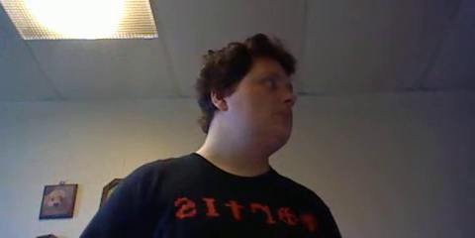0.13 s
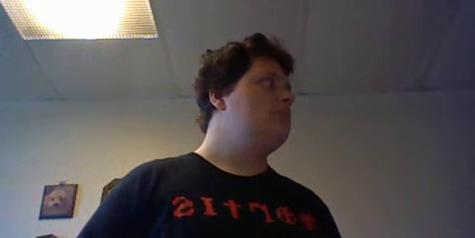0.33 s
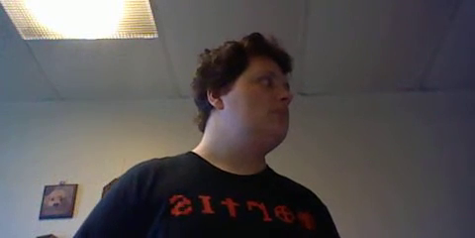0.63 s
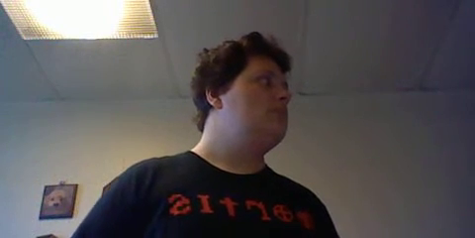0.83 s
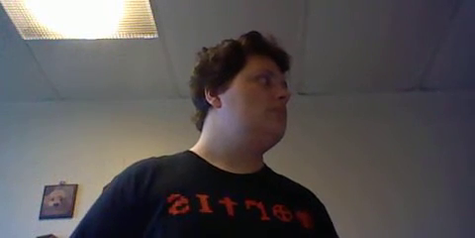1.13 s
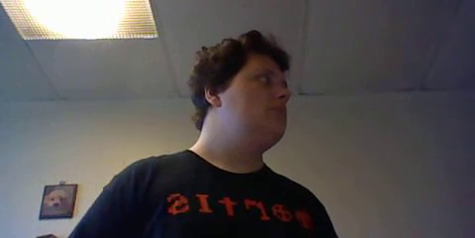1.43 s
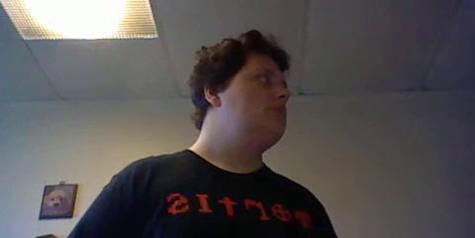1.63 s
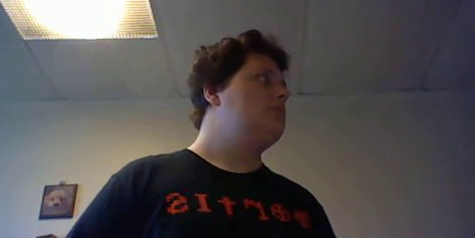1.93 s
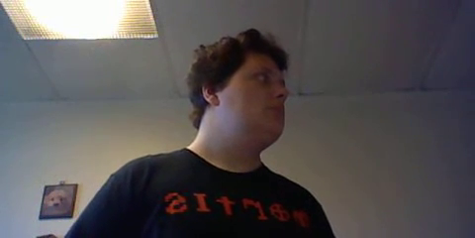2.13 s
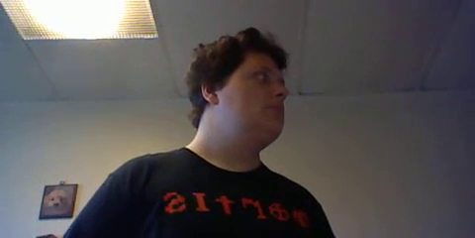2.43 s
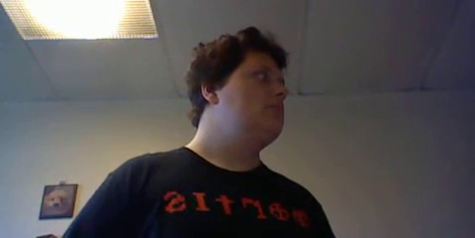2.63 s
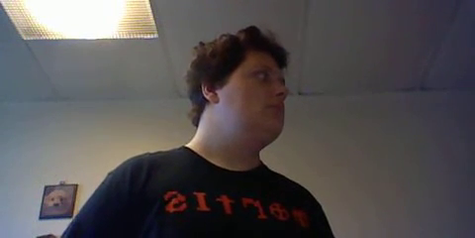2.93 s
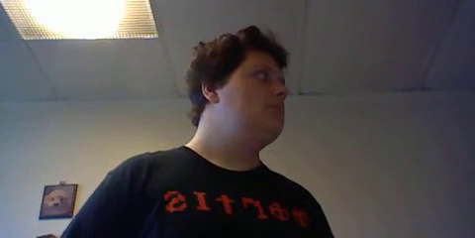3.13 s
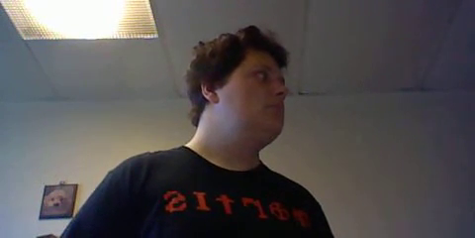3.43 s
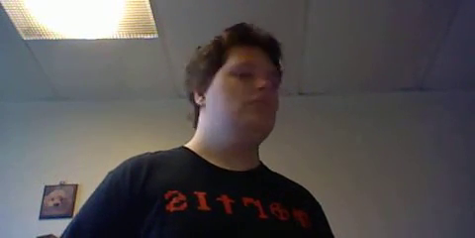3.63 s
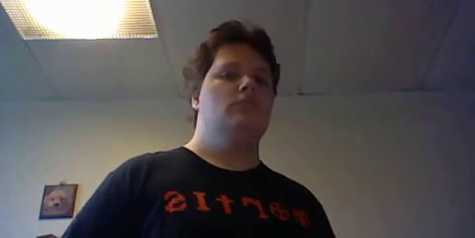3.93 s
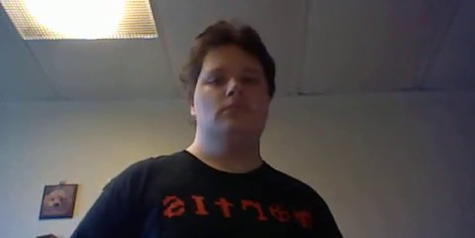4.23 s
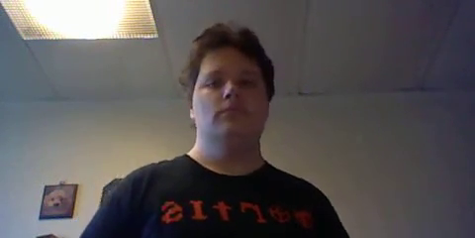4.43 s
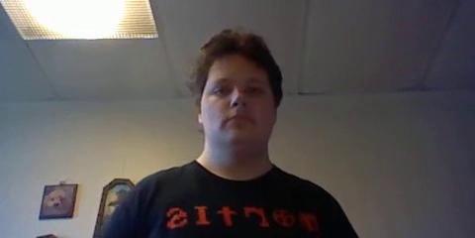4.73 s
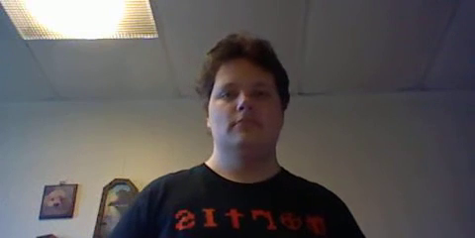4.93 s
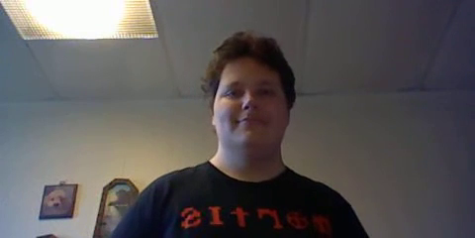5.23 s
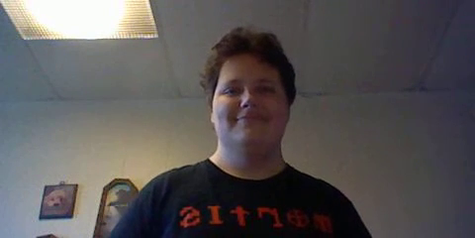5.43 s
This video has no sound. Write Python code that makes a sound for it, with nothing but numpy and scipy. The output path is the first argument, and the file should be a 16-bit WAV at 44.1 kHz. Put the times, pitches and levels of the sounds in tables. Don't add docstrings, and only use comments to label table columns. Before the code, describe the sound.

A microwave oven hums and buzzes steadily with a whirring fan while a vehicle outside idles low and then pulls away, under faint hiss.

```python
import sys
import numpy as np
from scipy import signal
from scipy.fft import rfft, irfft, next_fast_len
from scipy.io import wavfile
from scipy.ndimage import map_coordinates

SR = 44100
rng = np.random.default_rng(int(sys.argv[2]) if len(sys.argv) > 2 else 0)


def to_wav(sig):
    pcm = np.clip(np.atleast_2d(sig), -1, 1) * 32767
    pcm = np.round(pcm).astype(np.int16)
    wavfile.write(sys.argv[1], SR, pcm.T)


def decibels_to_gain(level_db):
    exponent = np.asarray(level_db, float) / 20
    return 10 ** exponent


N = 245195
TIME_S = np.arange(N) / SR
SINCE_BEAT_S = TIME_S - .697


def unit(x):
    return x / np.sqrt(np.mean(x ** 2) + 1e-20)


def along(points, hz):
    f, v = np.transpose(points)
    return np.interp(np.log(hz + 1), np.log(f + 1), v)


def over_time(rows):
    s, value = np.transpose(rows)
    return np.interp(TIME_S, s, value)


def wobble(rate_hz):
    knots = rng.standard_normal(int(N * rate_hz / SR) + 4)
    return map_coordinates(knots, [np.arange(N) * rate_hz / SR])


def filtered(x, response):
    m = next_fast_len(N + SR // 2)
    spectrum = rfft(x, m) * response(np.fft.rfftfreq(m, 1 / SR))
    return irfft(spectrum, m)[..., :N]


def noise(response):
    return unit(filtered(rng.standard_normal(N), response))


def tones(rows, turns, unsteady_db, rate_hz):
    lag_turns = np.arange(len(rows)) ** 2 * (np.sqrt(5) - 1) / 2
    total = 0
    for (multiple, level_db), lag in zip(rows, lag_turns):
        peak = np.sqrt(2) * decibels_to_gain(level_db + unsteady_db * wobble(rate_hz))
        total = total + peak * np.sin(2 * np.pi * (multiple * turns - lag))
    return total


def transformer():
    mains_hz = 59.945
    # mains_multiple, level_db (rms)
    core = [(1, -45), (2, -38), (3, -58.5), (4, -43), (5, -66), (6, -54), (7, -64), (8, -70), (9, -75),
            (10, -70), (11, -65), (12, -72.5), (13, -74.5), (14, -60), (15, -68.5), (16, -80), (17, -79.5),
            (19, -78.5), (20, -76.5), (22, -78), (23, -75.5), (25, -77.5), (26, -76.5)]
    # time_s, gain_db
    shade = [
        (0, -1),
        (.9, 0),
        (2.1, -1.5),
        (3.4, -0.5),
        (5.56, 0.3),
    ]
    return decibels_to_gain(over_time(shade)) * tones(core, mains_hz * SINCE_BEAT_S, unsteady_db=1.0, rate_hz=4)


def fan():
    shaft_hz = 44.111
    # shaft_multiple, level_db (rms)
    blades = [(1, -66), (2, -70), (3, -65.5), (4, -39), (5, -70.5), (7, -68.5), (8, -50), (10, -71),
              (11, -76.5), (12, -66), (16, -64), (17, -77.5), (18, -69.5), (19, -64.5), (20, -58),
              (24, -79.5)]
    turns = shaft_hz * SINCE_BEAT_S + .014 + .006 * wobble(1.6)
    return tones(blades, turns, unsteady_db=1.02, rate_hz=6)


def air():
    # freq_hz, density_db (per Hz)
    stream = [(20, -10), (35, -8.5), (70, -12), (100, -4), (160, -9), (260, -13.5), (310, -16.5),
              (400, -15), (580, -25), (1100, -28), (1500, -30), (2600, -35.5), (4000, -41), (8000, -57.5)]
    # centre_hz, width_hz, level_db
    case = [(103, 14, -6.5), (160.5, 16, -2), (216, 13, -12), (300, 17, -11), (326.4, 30, -10.5),
            (456.5, 39, -11.5), (504.6, 50, -16.5), (710, 90, -21.5), (780, 72, -22.5), (870.5, 78, -14.5),
            (912, 37, -20.5), (1008, 37, -22.5), (1156, 42, -27.5), (1264, 65, -27), (1396, 100, -29.5),
            (1717, 47, -27), (2083, 53, -28.5), (2429, 36, -32), (2730, 65, -39.5)]

    def case_gain(hz):
        power = sum(decibels_to_gain(2 * db) / (1 + (2 * (hz - centre) / width) ** 4) for centre, width, db in case)
        return np.sqrt(power)

    rush = noise(lambda hz: decibels_to_gain(along(stream, hz)))
    ring = noise(case_gain)
    rush_db = -46.5 + 0.41 * wobble(7)
    ring_db = -47.5 + .6 * wobble(5)
    return decibels_to_gain(rush_db) * rush + decibels_to_gain(ring_db) * ring


def motors():
    # freq_hz, level_db (rms)
    drones = [(57.71, -46), (47.65, -44), (80.5, -61), (869.7, -70), (1770.1, -83), (3162.2, -87),
              (3476.9, -90), (4735.8, -90)]
    return tones(drones, SINCE_BEAT_S, unsteady_db=2.0, rate_hz=4.1)


def vehicle():
    # time_s, firing_hz
    firing = [(0, 30.8), (1.5, 31), (1.95, 44.45), (2.15, 48.34), (2.6, 48.37), (3.05, 52.88),
              (3.45, 57.59), (3.85, 59.05), (4.35, 60.06), (4.9, 62.21), (5.56, 62.82)]
    # freq_hz, level_db (rms)
    wall = [(31, -55), (37, -52), (44, -42), (50, -41), (54.5, -52), (59, -40), (60.3, -43.5), (62, -50.5)]
    rate_hz = over_time(firing)
    turns = np.cumsum(rate_hz) / SR + .535
    engine = np.sqrt(2) * decibels_to_gain(along(wall, rate_hz)) * np.sin(2 * np.pi * turns)

    idle_db, growth_db_per_octave, sway_db = -49.5, 5, 2.5
    rumble_db = idle_db + growth_db_per_octave * np.log2(rate_hz / rate_hz[0]) + sway_db * wobble(2.5)
    rumble = noise(lambda hz: (hz / 9) ** 2 / (1 + (hz / 9) ** 2) / (1 + (hz / 28) ** 6))
    return engine + decibels_to_gain(rumble_db) * rumble


def scene():
    return (transformer() + fan() + air() + motors() + vehicle())[None]


def microphone_hiss():
    chop_hz, level_db = 354.03, -63.0
    # freq_hz, density_db (per Hz)
    hiss_curve = [(500, -33.5), (2000, -6), (4000, 0.5), (6000, -0.5), (7500, -3.5)]
    chop = 1 + .42 * np.cos(2 * np.pi * chop_hz * TIME_S - 3.5)
    return decibels_to_gain(level_db) * unit(chop * noise(lambda hz: decibels_to_gain(along(hiss_curve, hz))))


def band_limit(x):
    return signal.sosfilt(signal.butter(12, 8790, fs=SR, output="sos"), x)


def record(dry):
    # freq_hz, gain_db
    channel_edge = [(7000, 0.5), (7700, -1), (8200, -7.5), (8600, -17.5), (8900, -31), (9200, -70)]
    mix = filtered(dry + microphone_hiss(), lambda hz: decibels_to_gain(along(channel_edge, hz)))
    return band_limit(mix)


dry = scene()
out = record(dry)
to_wav(out)
```